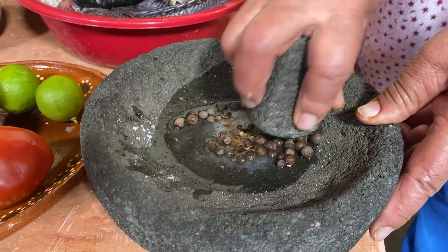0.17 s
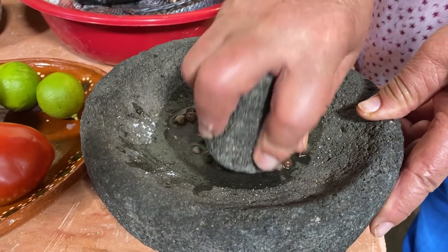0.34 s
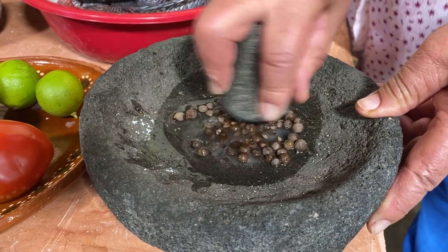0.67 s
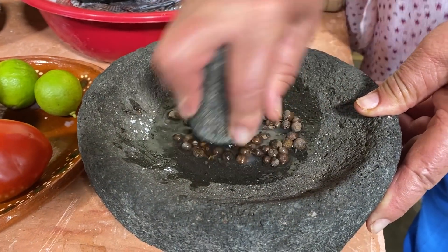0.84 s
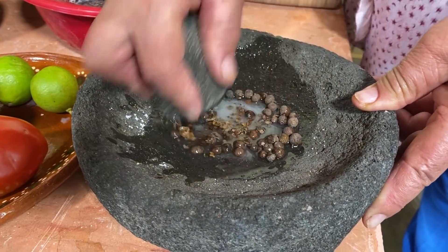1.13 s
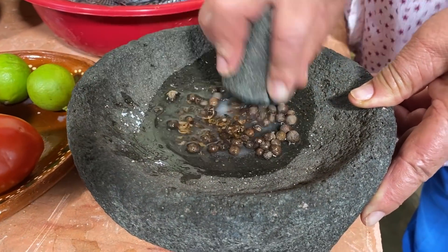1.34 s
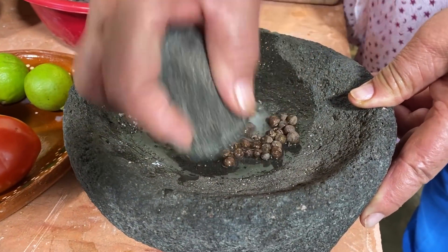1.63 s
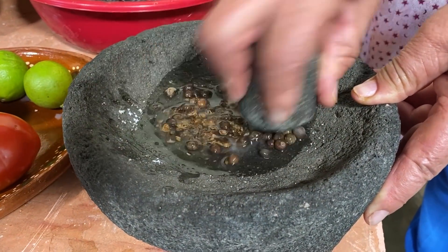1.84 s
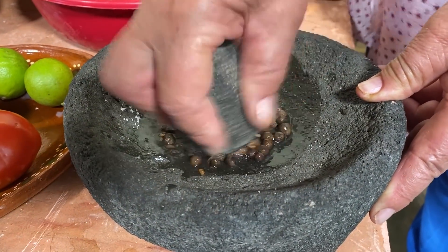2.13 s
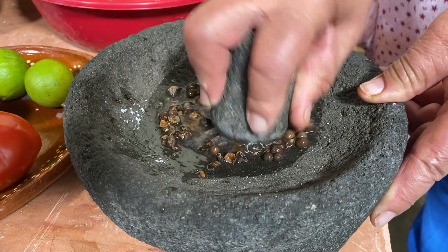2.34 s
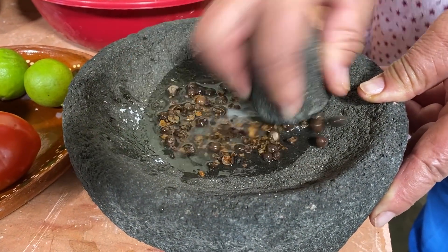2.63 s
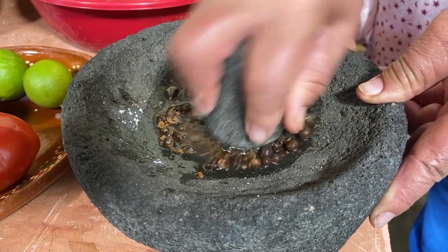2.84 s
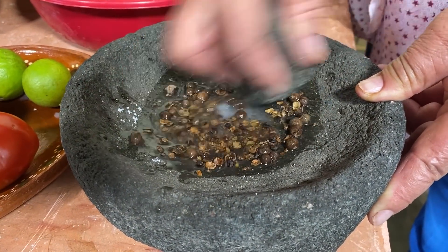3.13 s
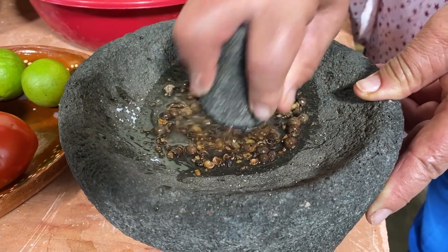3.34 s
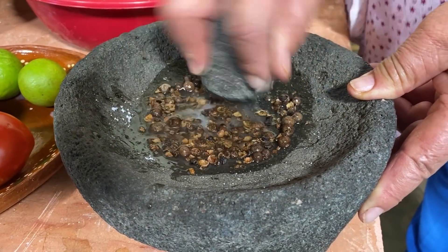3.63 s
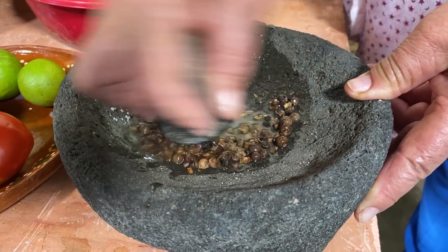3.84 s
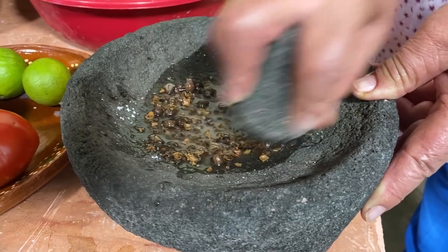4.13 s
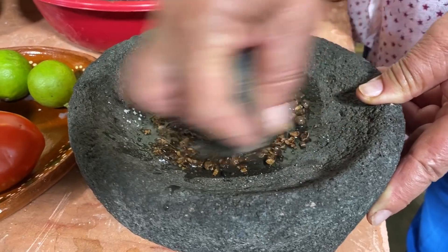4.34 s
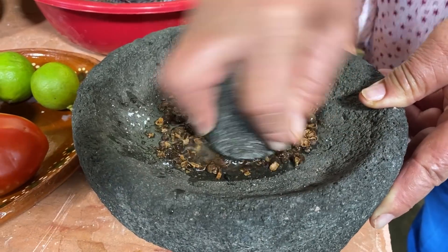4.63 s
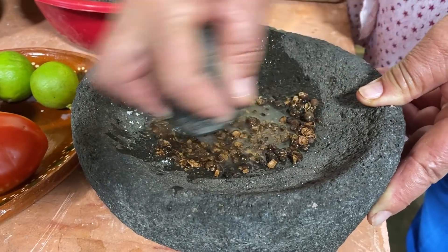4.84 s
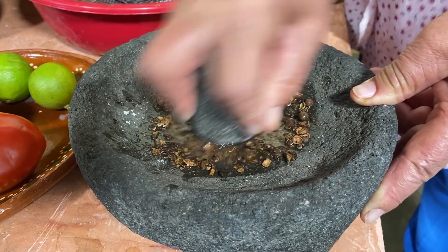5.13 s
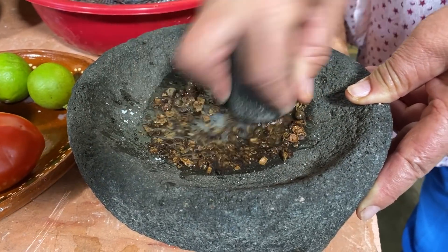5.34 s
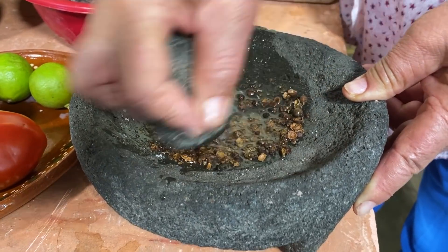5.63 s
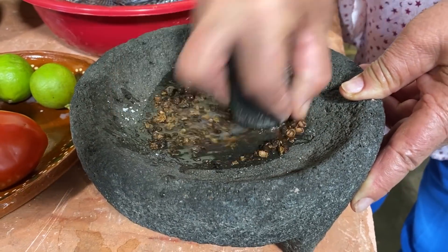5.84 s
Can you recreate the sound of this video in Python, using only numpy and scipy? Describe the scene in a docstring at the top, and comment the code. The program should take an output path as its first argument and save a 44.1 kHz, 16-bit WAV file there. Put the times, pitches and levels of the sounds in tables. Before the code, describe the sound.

A stone pestle knocks and grinds wet peppercorns in a stone mortar, with crisp seed snaps, gritty scrapes and a short kitchen echo.

```python
"""A stone pestle pounds and grinds wet peppercorns in a stone mortar, heard close by in a small kitchen.
It opens on a rub, faint pestle pings and seed snaps; the first hard blow lands at 0.3 s, harder ones at 1.3 and 2.1 s.
Blows crowd together from 3.0 to 3.7 s, the loudest seed splits at 4.2 s, and after a hard blow at 4.6 s the work softens.
Blows and rubs drive the mortar's modes, seeds are short resonant noise clicks, grit is sparse noise impulses;
wet paste ticks, room tails, a shaking table and a steady background lie under it all."""
import sys
import numpy as np
from scipy import signal
from scipy.fft import rfft, irfft, next_fast_len
from scipy.io import wavfile
from scipy.ndimage import map_coordinates

SR = 44100
rng = np.random.default_rng(int(sys.argv[2]) if len(sys.argv) > 2 else 0)


def wrap_up_sound(samples):
    """Save the sound to the file named by the first command line argument, as 16-bit audio."""
    columns = np.atleast_2d(samples).T
    # keep every value between -1 and 1, then stretch to whole-number steps
    tamed = np.clip(columns, -1, 1)
    steps = np.round(tamed * 32767).astype(np.int16)
    wavfile.write(sys.argv[1], SR, steps)


N = 264524  # samples, about 6 s
MIRROR = np.array([[1], [-1]])  # opposite shifts for left and right


def amp(db):
    """Decibels to gain."""
    return 10 ** (np.asarray(db) / 20)


def unit(x):
    """Scale to rms 1."""
    return x / np.sqrt(np.mean(x ** 2) + 1e-20)


def along(points, hz):
    """Read a curve of (Hz, value) points on a log frequency axis."""
    point_hz, value = np.transpose(points)
    return np.interp(np.log(hz + 1), np.log(point_hz + 1), value)


def wobble(rate):
    """A smooth random curve with `rate` knots a second."""
    knots = rng.standard_normal(int(N * rate / SR) + 4)
    return map_coordinates(knots, [np.arange(N) * rate / SR])


def filtered(x, response):
    """Filter x by a complex response of frequency, zero-padded."""
    m = next_fast_len(N + SR // 2)
    return irfft(rfft(x, m) * response(np.fft.rfftfreq(m, 1 / SR)), m)[..., :N]


def crackle(per_s, spread_db, smooth):
    """Sparse slips of uneven size over a smooth noise."""
    size = amp(spread_db * rng.exponential(size=N)) * rng.standard_normal(N)
    slips = size * (rng.random(N) < per_s / SR)
    return unit(slips) + smooth * rng.standard_normal(N)


# colour of the steady kitchen background: pitch_hz [Hz], level_db [dB, relative]
AIR = [(20, -52.5), (40, -2), (80, -11.5), (200, 4.5), (560, -27.5), (650, -17), (1290, -25), (1840, -22),
       (5570, -35), (8140, -41), (12500, -50), (16000, -53.5)]
# how alike left and right hear that background: pitch_hz [Hz], likeness [0 to 1]
AIR_ALIKE = [(30, .3), (150, .6), (500, .7), (3000, 0.26), (12000, 0.23)]
AIR_DB = -55.0


def air():
    """Steady broadband noise, partly shared between left and right."""
    def mid_side(hz):
        turn = np.arccos(np.clip(along(AIR_ALIKE, hz), -1, 1)) / 2
        return amp(along(AIR, hz)) * [np.cos(turn), np.sin(turn)]

    mid, side = filtered(rng.standard_normal((2, N)), mid_side)
    return amp(AIR_DB) * unit(np.array([mid + side, mid - side]))


TABLE_REST_DB, TABLE_HIT_DB = -50.5, -30  # shake at rest; after a 0 dB blow, before its rise and decay
TABLE_FOLLOWS = 0.34  # dB of shake per dB of blow
TABLE_RISE_S, TABLE_T60 = 0.016, 0.34  # rise time constant and 60 dB decay, s


def table():
    """The table shakes as low-band noise, faintly at rest and more strongly after each blow."""
    low_band = [(28, -40), (42, 6.5), (70, -1.0), (110, -3), (200, -13.5), (300, -45.0)]  # (Hz, dB)
    a, b = filtered(rng.standard_normal((2, N)), lambda f: amp(along(low_band, f)))
    start_s, blow_db = np.array(BLOWS)[:, :1], np.array(BLOWS)[:, 1:2]
    since = np.maximum(np.arange(N) / SR - start_s, 0)
    decay = amp(TABLE_HIT_DB + TABLE_FOLLOWS * blow_db - 60 * since / TABLE_T60)
    jolts = decay * (1 - np.exp(-since / TABLE_RISE_S))
    level = np.sqrt(amp(TABLE_REST_DB) ** 2 + np.sum(jolts ** 2, axis=0))
    return level * unit(np.array([a + 0.42 * b, a - 1.6 * b]))


# decay of the room: pitch_hz [Hz], t60_s [s]
ROOM_DECAY = [(150, 0.31), (700, 0.31), (2000, 0.31), (5000, 0.3), (13000, 0.12)]
# share of the sound sent to the room: pitch_hz [Hz], level_db [dB]
ROOM_SEND = [(120, -4.5), (250, -8.5), (700, -11.5), (3000, -11.5), (12000, -13)]


def kitchen(x):
    """Reverberation: a fresh noise tail for every quarter second, each frequency dying at its own speed."""
    out, step = np.zeros((2, N + SR)), SR // 4
    delay = 200  # samples before the room answers
    x = filtered(x, lambda f: amp(along(ROOM_SEND, f)))
    for at in range(0, N, step):
        hz, t, z = signal.stft(rng.standard_normal((2, SR // 2)), SR, nperseg=256)
        decay = amp(-60 * t / along(ROOM_DECAY, hz)[:, None])
        tail = signal.istft(z * decay, SR, nperseg=256)[1]
        tail[1] = 0.62 * tail[0] + 0.57 * tail[1]  # both sides hear much the same field
        wet = signal.fftconvolve(x[None, at:at + step], tail / np.linalg.norm(tail[0]), axes=1)
        out[:, at + delay:at + delay + wet.shape[1]] += wet
    return out[:, :N]


def paste():
    """The wet paste ticks faintly all the while: sparse grit-coloured noise in random clusters."""
    ticks = amp(4.5 * wobble(14)) * crackle(200, spread_db=2.6, smooth=.3)
    return amp(-71.5) * unit(filtered(ticks, lambda f: amp(along(GRIT, f))))


# pings of the pestle when its flank is caught: start_s [s], level_db [dB, before onset and decay]
PINGS = [(.002, -38.5), (0.033, -47), (.07, -51), (1.338, -19), (3.24, -28.5), (3.284, -35.5), (3.665, -32)]
PESTLE_HZ, PESTLE_T60 = 2886, 0.079  # centre pitch, Hz; 60 dB decay, s


def pings():
    """One mode of the pestle, damped by the hand; the shifting grip makes it waver."""
    out, t = np.zeros(N + SR), np.arange(SR // 4) / SR
    for start_s, level_db in PINGS:
        waver = 0.064 * np.cumsum(rng.standard_normal(len(t)))  # random walk of phase, radians
        decay = amp(-60 * t / PESTLE_T60)
        onset = 1 - np.exp(-t / .0003)
        ring = np.sin(2 * np.pi * PESTLE_HZ * t + waver) * decay * onset
        out[round(start_s * SR):][:len(t)] += amp(level_db) * ring
    return out[:N]


# the seeds that break loudest: start_s [s], level_db [dB, peak], pitch_hz [Hz, centre of the shell's resonance]
SNAPS = [(0.0301, -29, 8250), (0.115, -29, 6000), (0.1332, -33.5, 7600), (0.248, -16, 11400),
         (0.2646, -26, 10400), (0.285, -12, 9000), (0.3084, -12.5, 3300), (0.3494, -14, 7860),
         (0.4959, -34, 7400), (0.6511, -29, 7900), (0.7437, -19.5, 3870), (0.7562, -12.5, 8750),
         (0.7614, -14, 8400), (0.7786, -16, 5800), (0.895, -41, 9700), (1.022, -36, 7300),
         (1.122, -29.5, 7460), (1.196, -30, 7540), (1.3174, -33, 8600), (1.3325, -9, 9900),
         (1.3748, -8.5, 10000), (1.379, -14, 7800), (1.6652, -35, 7000), (1.7405, -26.5, 7560),
         (1.763, -27.5, 7700), (1.7652, -28, 6150), (1.8164, -26.5, 9200), (1.931, -25.5, 7000),
         (1.937, -26, 5700), (1.9444, -14.5, 5400), (1.9616, -8, 8300), (1.966, -21, 7300),
         (1.974, -17.5, 7640), (1.998, -16, 9450), (2.0708, -19.5, 3120), (2.264, -29, 10100),
         (2.2986, -20.5, 10200), (2.414, -40, 7960), (2.6633, -6.5, 10300), (2.6726, -21, 10000),
         (2.7204, -5.5, 9300), (2.7234, -24, 8500), (2.7537, -19.5, 7640), (2.784, -25.5, 7500),
         (3.0245, -25, 7760), (3.0894, -31, 8850), (3.1047, -27, 7570), (3.1204, -25.5, 8250),
         (3.189, -30, 3600), (3.2156, -34.5, 5630), (3.2395, -4.5, 9800), (3.254, -24.5, 7300),
         (3.274, -27.5, 8150), (3.2834, -4.5, 10900), (3.308, -14.5, 5130), (3.531, -31.5, 7900),
         (3.5409, -25, 7150), (3.6344, -18.5, 8100), (3.6391, -13, 9900), (3.6445, -26, 7400),
         (3.6963, -30, 9000), (3.708, -33, 9000), (3.942, -44.5, 8000), (3.9738, -23, 9200),
         (4.0234, -27, 7050), (4.1568, -10, 9050), (4.1601, -5, 9100), (4.1894, 0, 9700),
         (4.2503, -18.5, 9400), (4.2696, -31, 8800), (4.5467, -29, 3400), (4.5685, -6, 3380),
         (4.7483, -31, 7460), (4.7703, -32, 6860), (4.868, -21.5, 9900), (4.8749, -19.5, 6000),
         (4.8893, -20.5, 8250), (5.0223, -28, 10000), (5.0924, -22.5, 8000), (5.168, -45, 5000),
         (5.54, -44, 6000), (5.7047, -28.5, 9600), (5.9717, -32.5, 6300)]
SNAP_T60, CRUMBLE_T60 = 0.00099, 0.025  # s


def snaps():
    """A shell splits in one sharp click and crumbles for some milliseconds; each lies elsewhere in the bowl."""
    out, t = np.zeros((2, N + SR)), np.arange(1024) / SR
    f = np.fft.rfftfreq(len(t), 1 / SR)
    for start_s, level_db, hz in SNAPS:
        split = amp(-60 * t / SNAP_T60)
        crumble = amp(-20 - 60 * t / CRUMBLE_T60)
        shape = (split + crumble) * (1 - np.exp(-t / 7e-5))
        shell = 1j * f * hz * 0.37 / (hz * hz - f * f + 1j * f * hz * 0.76)
        treble_loss = (1 + (1j * f / 12500) ** 2 + 1j * f / 12000) ** 2
        colour = shell * (shell + 1.1) / treble_loss
        lag = np.exp(2j * np.pi * f * 2.2e-6 * rng.standard_normal() * MIRROR)  # left against right
        pan = amp(1.64 * rng.standard_normal() * MIRROR)
        noise = shape * rng.standard_normal(len(t))
        click = irfft(rfft(noise) * colour * lag * pan, len(t))
        out[:, round(start_s * SR):][:, :len(t)] += amp(level_db) * click / abs(click).max()
    return out[:, :N]


# modes of the mortar on its table: pitch_hz [Hz], width_hz [Hz], level_db [dB, relative]
MORTAR = [(91, 15, -15), (128, 14, -12), (178.3, 48, -4.5), (246.7, 53, -0.5), (308.6, 67, -10),
          (407.4, 38.4, -1.5), (490, 130, -11.5), (633.7, 67.6, 0), (808, 68, -7), (839, 169, -2),
          (966, 148, 2.2), (1488, 256, -8.5), (1910, 98, -10.5), (2227, 130, -20.5), (2980, 500, -18)]


def modes(f, spread_db=0, detune=0):
    """The mortar's resonances; where it is struck and held changes each mode's strength and pitch."""
    chance = rng.standard_normal((len(MORTAR), 2))
    pitch, width, level_db = np.transpose(MORTAR)[..., None]
    pitch = pitch * (1 + detune * chance[:, :1])
    sign = (-1) ** np.arange(len(MORTAR))[:, None]  # neighbouring modes face opposite ways
    gain = sign * amp(level_db + spread_db * chance[:, 1:])
    resonance = 1j * f * width / (pitch * pitch - f * f + 1j * f * width)
    return np.sum(gain * resonance, axis=0)


# rubs of the pestle over the crumbs: start_s [s, moment of greatest force],
# rise_ms [ms, from 6 dB down to the peak], rumble_db [dB], grit_db [dB]
RUBS = [(0.012, 22, -42.5, -53.5), (0.08, 33, -59, -70), (0.12, 15, -66, -62), (0.225, 55, -69, -89),
        (0.312, 32, -52, -50), (0.36, 20, -68, -48), (0.504, 15, -56.5, -67), (0.568, 12, -52.5, -44),
        (0.672, 15, -56, -73), (0.763, 13.2, -35, -38.5), (1.2, 11, -52, -63), (1.245, 16, -52.5, -59),
        (1.35, 14.5, -29.5, -50), (1.395, 11, -37, -49), (1.77, 17, -52.5, -47), (1.969, 26.3, -37, -38.5),
        (2.15, 42, -47, -56), (2.321, 14.6, -37.5, -50.5), (2.438, 29, -49, -65.5), (2.595, 12, -51, -44),
        (2.668, 3.9, -44, -50), (2.738, 35.2, -35.5, -45), (2.95, 7.6, -63.5, -57),
        (3.11, 12, -43.5, -58.5), (3.215, 3, -33, -55), (3.268, 38.6, -33.5, -52), (3.486, 11.5, -56, -57),
        (3.551, 18, -53, -66), (3.644, 7, -43, -43), (3.69, 20, -40.5, -60), (3.745, 29, -40, -70),
        (3.98, 7, -40, -46.5), (4.03, 10, -45.5, -45), (4.204, 19, -34.5, -46), (4.4, 26, -43.5, -55.5),
        (4.586, 13, -32, -51), (4.63, 28, -41, -58.5), (4.772, 12, -62, -50.5), (4.888, 18.8, -42, -47.5),
        (5.04, 25, -48, -67), (5.113, 31.4, -40, -51), (5.32, 11.4, -41.5, -61.5), (5.353, 7.8, -41, -56.5),
        (5.433, 19, -45, -77.5), (5.494, 4.7, -37.5, -55), (5.525, 13, -50, -73), (5.579, 31, -56.5, -70),
        (5.805, 24, -40.5, -55), (5.876, 16, -55, -62), (5.985, 28, -57, -66)]
# colour of the scrape: pitch_hz [Hz], level_db [dB, relative]
SCRAPE = [(500, 13), (900, 4.5), (1400, -0.5), (1900, 2), (2300, -4), (2880, 3.5), (3500, -16.5),
          (5500, -3), (8000, -36)]
# colour of the grit: pitch_hz [Hz], level_db [dB, relative]
GRIT = [(1500, -9), (3500, 2.5), (5500, -12), (8000, 0.5), (10500, -4), (13000, -7.5), (15000, -22),
        (16500, -25)]
FALL_OVER_RISE = 1.19  # a rub dies a little slower than it swells
SCRAPE_DB, SCRAPE_FOLLOWS_RUMBLE = -2.5, 0.7  # offset, dB; place between grit (0) and rumble (1)
# after a blow the pestle skids: rumble, scrape and grit in dB relative to the blow
SKID_RISE_MS, SKID_FALL_MS, SKID_DB = 1.8, 10, [-26.5, -37, -39.5]


def grinding():
    """In each rub or skid stone slips on stone into the mortar's modes while crumbs scrape and crackle."""
    strokes = []
    for start_s, rise_ms, rumble_db, grit_db in RUBS:
        scrape_db = SCRAPE_DB + grit_db + SCRAPE_FOLLOWS_RUMBLE * (rumble_db - grit_db)
        strokes.append((start_s, rise_ms, FALL_OVER_RISE * rise_ms, rumble_db, scrape_db, grit_db))
    for start_s, blow_db, _ in BLOWS:
        levels = blow_db + np.array(SKID_DB)
        strokes.append((start_s + SKID_RISE_MS / 1e3, SKID_RISE_MS, SKID_FALL_MS, *levels))

    force, ms = np.zeros((3, N)), 1e3 * np.arange(N) / SR  # rows: rumble, scrape, grit
    for peak_s, rise_ms, fall_ms, *levels in strokes:
        near = slice(max(round(peak_s * SR) - SR // 8, 0), round(peak_s * SR) + SR // 4)
        late = ms[near] - 1e3 * peak_s
        swell = amp(-6 * (abs(late) / np.where(late < 0, rise_ms, fall_ms)) ** 1.286)
        force[:, near] += amp(levels)[:, None] * swell

    bursts = wobble(70)  # shared by crumbs and slips
    crumbs = amp(2.2 * bursts + 2.5 * wobble(200)) * crackle(2500, spread_db=2.1, smooth=.9)
    slips = unit(amp(0.6 * bursts) * crackle(700, spread_db=2.4, smooth=0.6))
    # slips at even force set the reference level of the rumble
    even, pushed = filtered(np.array([slips, slips * force[0]]), lambda f: modes(f) / (1 + 1j * f / 800) ** 2)
    rumble = pushed / np.std(even)
    scrape = unit(filtered(crumbs, lambda f: amp(along(SCRAPE, f))))
    grit = unit(filtered(crumbs, lambda f: amp(along(GRIT, f))))
    return rumble + force[1] * scrape + force[2] * grit


# blows of stone on stone: start_s [s], level_db [dB, peak of the knock], contact_ms [ms, softness of the push]
BLOWS = [(0.1882, -32, 3.6), (0.2854, -31, 2.4), (0.3073, -9, 0.49), (0.3477, -26.5, 0.44),
         (0.6536, -32, 4.4), (0.7458, -29, 2.4), (0.7687, -24.5, 1.7), (1.024, -28.5, 6.9),
         (1.121, -30, 2.8), (1.1694, -22.5, 3), (1.3364, -3.5, 0.51), (1.381, -12, 0.78),
         (1.6665, -27.5, 2.9), (1.9361, -26, 2.9), (1.964, -28.5, 2.8), (2.0677, -6, 0.86),
         (2.301, -27, 3.9), (2.323, -27, 1.1), (2.415, -35, 0.32), (2.6223, -33, 1), (2.6676, -26.5, 2.5),
         (2.707, -35, 0.82), (2.7523, -22, 1.9), (3.0269, -17.5, 2.05), (3.1094, -19, 2.04),
         (3.189, -16, 0.39), (3.2143, -23, 2.14), (3.2424, -4.5, 0.29), (3.2868, -16, 0.38),
         (3.5387, -21, 2.7), (3.5568, -14.5, 1.86), (3.6354, -28.5, 0.27), (3.664, -13.5, 0.28),
         (3.7247, -27.5, 1.2), (3.979, -28, 6.3), (4.1104, -32, 1.5), (4.163, -12.5, 2),
         (4.2497, -30, 0.21), (4.2878, -18, 1.18), (4.5422, -31.5, 2.7), (4.5692, -4, 0.64),
         (4.8093, -35.5, 7.7), (4.9387, -17.5, 1.68), (5.0548, -28, 2), (5.0953, -23.5, 3.6),
         (5.3909, -29, 4.1), (5.4258, -24, 2.75), (5.493, -28, 1.2), (5.7113, -32, 3.5),
         (5.8761, -36.5, 4.4), (5.973, -34.5, 1.36)]
CRACK_DB, CRACK_LOSS_DB_PER_MS = -5.5, 5  # crack relative to knock; a longer contact rounds it off
SPREAD_RAD, SPREAD_HZ = 0.71, 350  # the low thud reaches left and right out of step


def blows():
    """A longer contact is a softer push and leaves the high modes still; the hard edge of the blow cracks in them."""
    out, t = np.zeros((2, N + SR)), np.arange(2 ** 13) / SR
    f = np.fft.rfftfreq(len(t), 1 / SR)
    fade = np.cos(np.pi / 2 * np.arange(len(t)) / len(t))
    for start_s, level_db, contact_ms in BLOWS:
        body = modes(f, spread_db=3.0, detune=0.031)
        phase = SPREAD_RAD * rng.standard_normal() * MIRROR / (1 + (f / SPREAD_HZ) ** 2)
        push = (1 + 2j * np.pi * f * contact_ms * 1.2e-4) ** -4  # time constant 0.12 of the contact
        knock = irfft(body * np.exp(1j * phase) * push, len(t))

        edge = rfft(rng.standard_normal(len(t)) * amp(-60 * t / 0.0053))
        edge_band = (1j * f / (1j * f + 1300)) ** 4 / (1 + 1j * f / 3200) ** 2
        crack = irfft(edge * body * edge_band, len(t))
        crack_db = CRACK_DB - CRACK_LOSS_DB_PER_MS * contact_ms
        hit = knock / abs(knock).max() + amp(crack_db) * crack / abs(crack).max()
        out[:, round(start_s * SR):][:, :len(t)] += amp(level_db) * fade * hit
    return out[:, :N]


def scene():
    """The work in the mortar, its echo in the room, the background and the table."""
    work = paste() + pings() + snaps() + grinding() + blows()
    return work + kitchen(work.mean(axis=0)) + air() + table()


# tonal balance of the two microphones: pitch_hz [Hz], level_db [dB, left over right]
LEAN = [(40, 9), (125, 3.5), (300, -0.5), (600, -1), (4000, -0.5), (8000, 0), (13000, -3.5)]
# phase between the two microphones: pitch_hz [Hz], lead_rad [radians, left ahead of right]
LEAD = [(300, 0), (430, -.15), (860, 0), (3100, 0), (5200, .25), (12700, .3), (14000, .6), (15500, 1.5)]
LOW_HZ, TOP_HZ = 38, 15800  # a steep roll-off above the top, a gentler one below the low limit


def record(dry):
    """Two microphones differ in colour and phase; both lose the deepest bass and the highest treble."""
    half = np.array([[.5], [-.5]])

    def response(hz):
        colour = amp(along(LEAN, hz) * half)
        phase = np.exp(1j * along(LEAD, hz) * half)
        return colour * phase / (1 + (hz / TOP_HZ) ** 90) / (1 + (LOW_HZ / (hz + 1)) ** 4)

    return filtered(dry, response)


dry = scene()
out = record(dry)
wrap_up_sound(out)
```